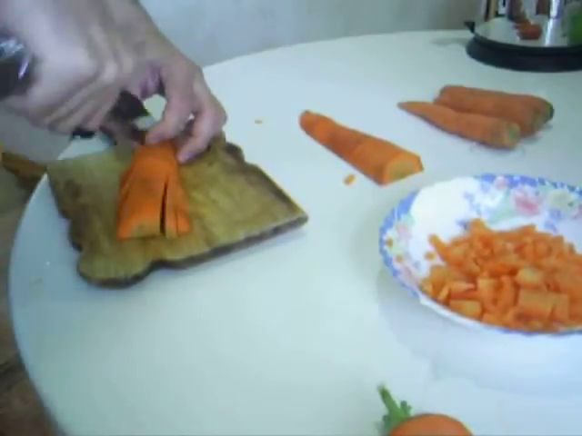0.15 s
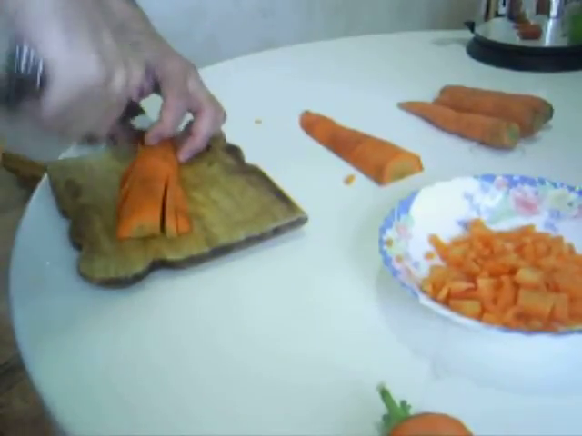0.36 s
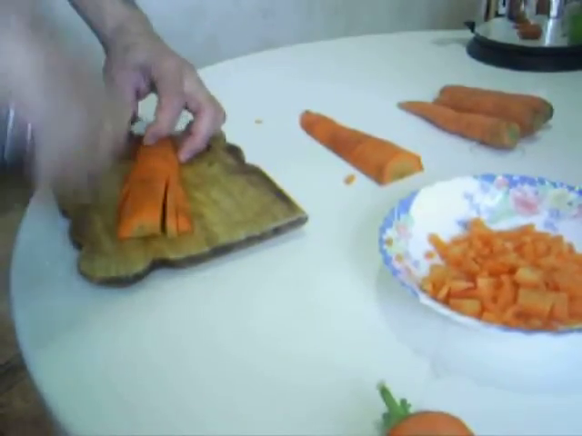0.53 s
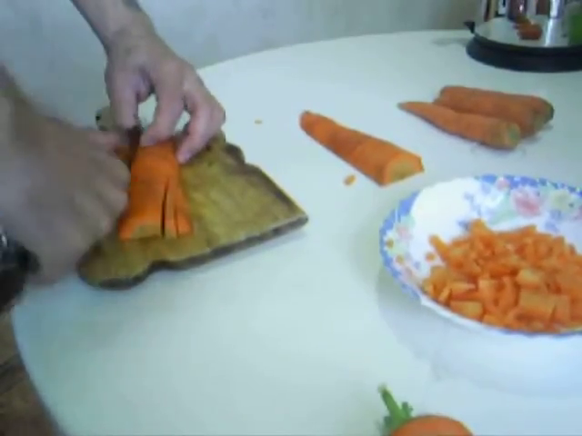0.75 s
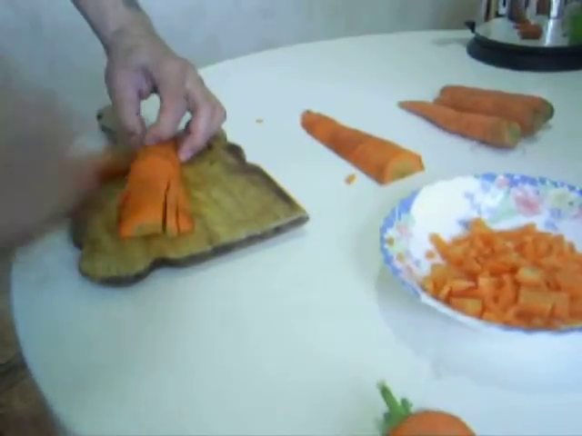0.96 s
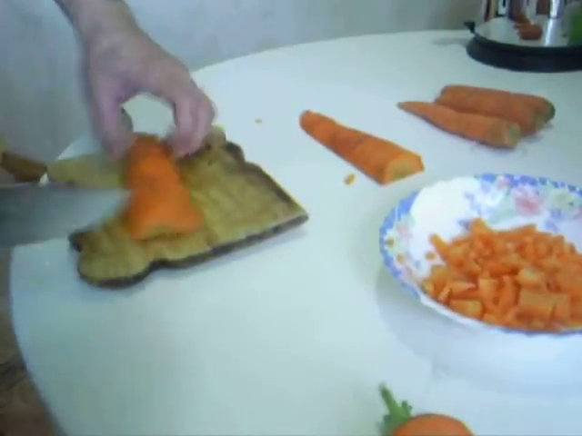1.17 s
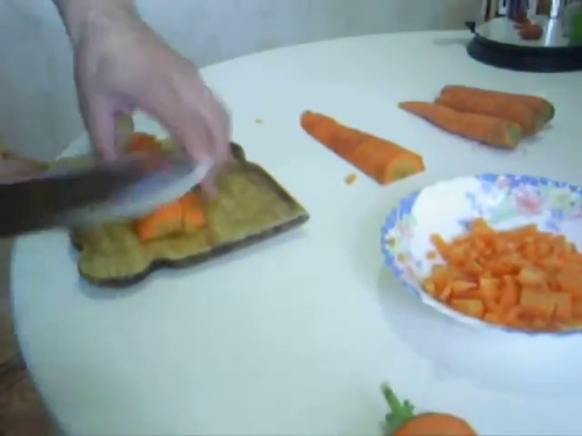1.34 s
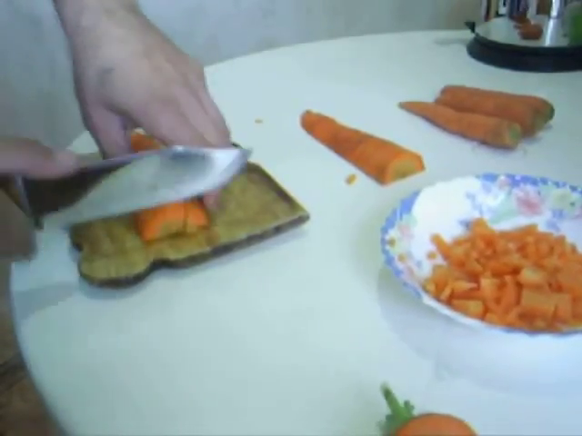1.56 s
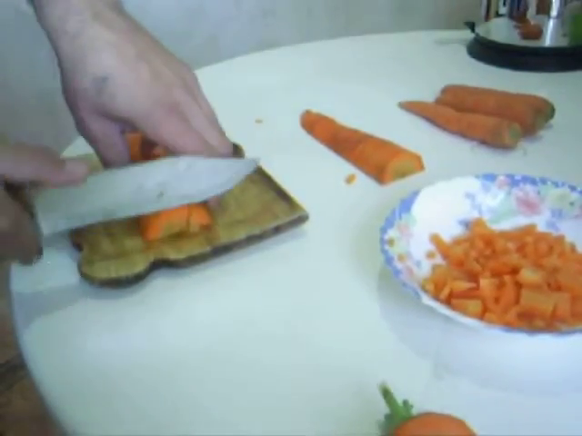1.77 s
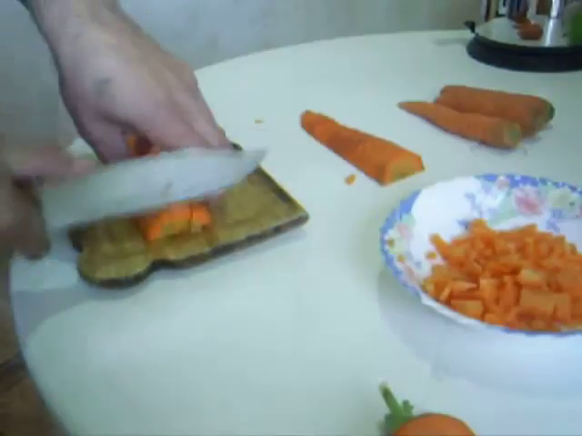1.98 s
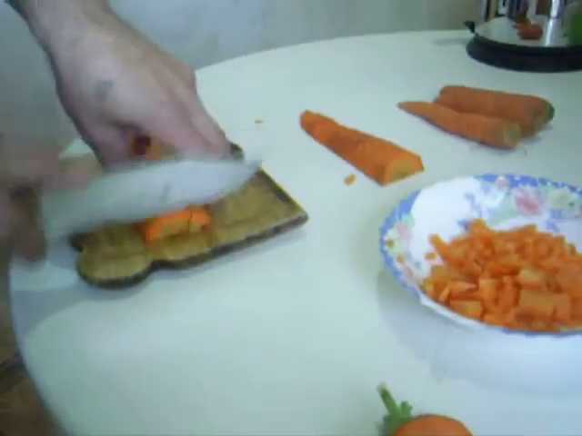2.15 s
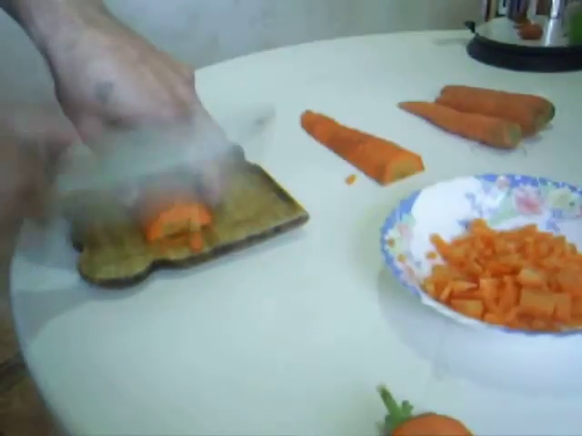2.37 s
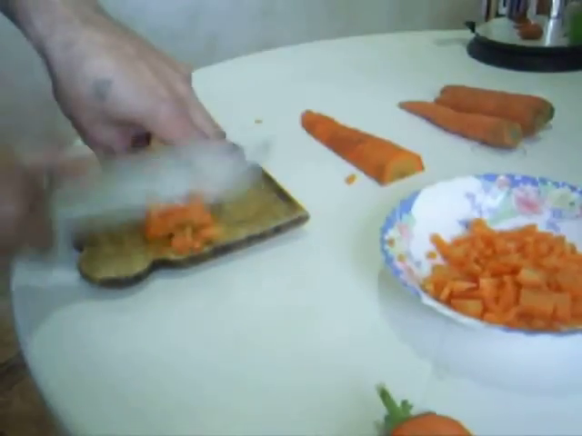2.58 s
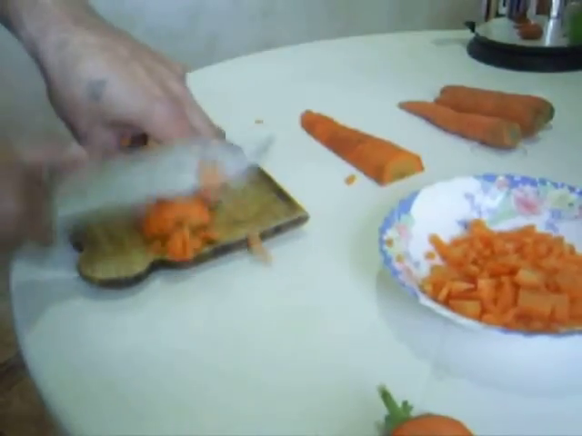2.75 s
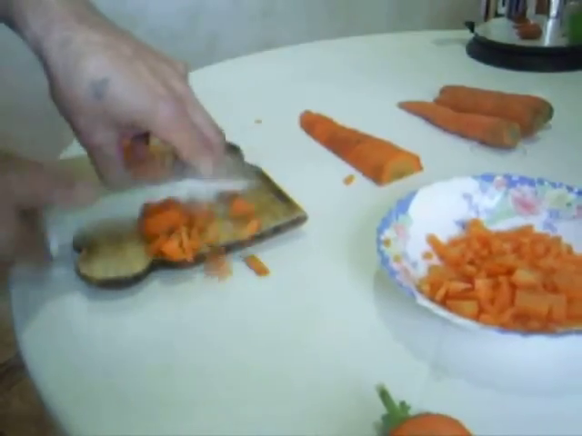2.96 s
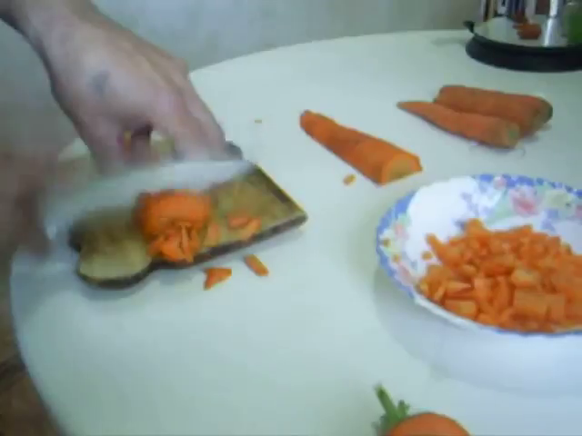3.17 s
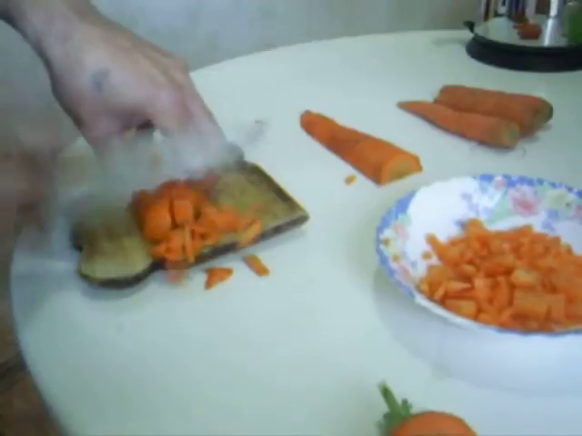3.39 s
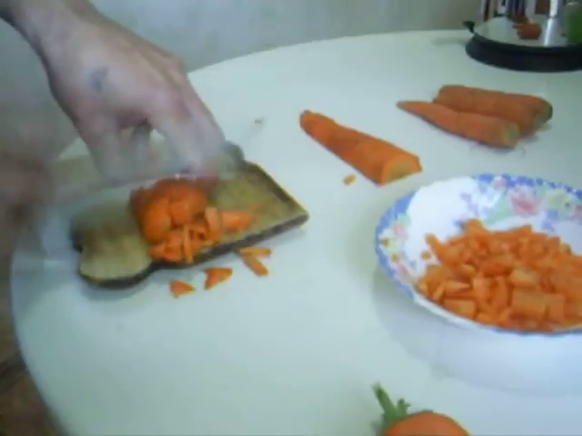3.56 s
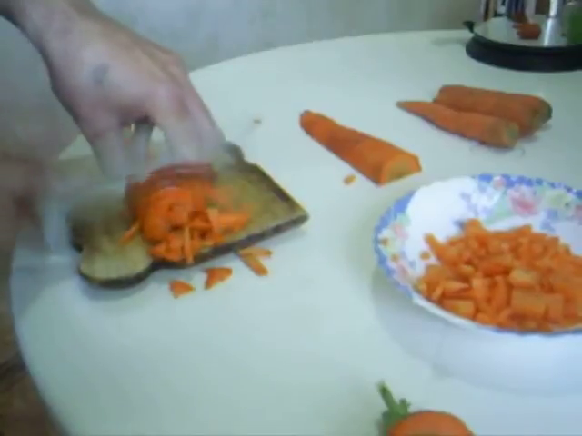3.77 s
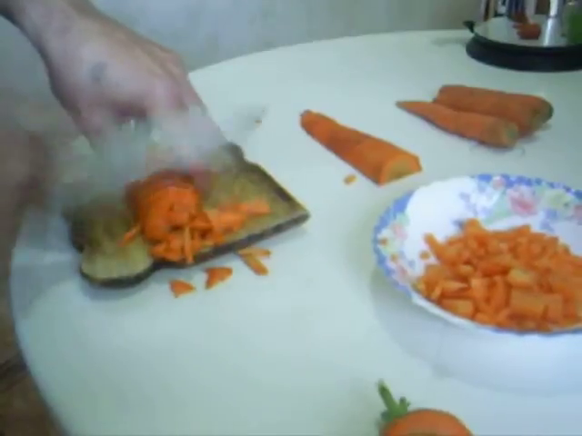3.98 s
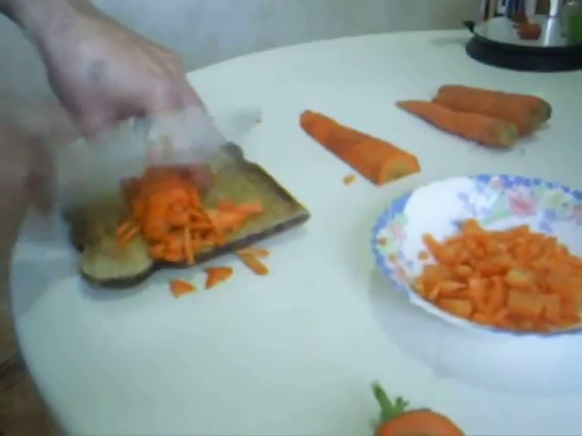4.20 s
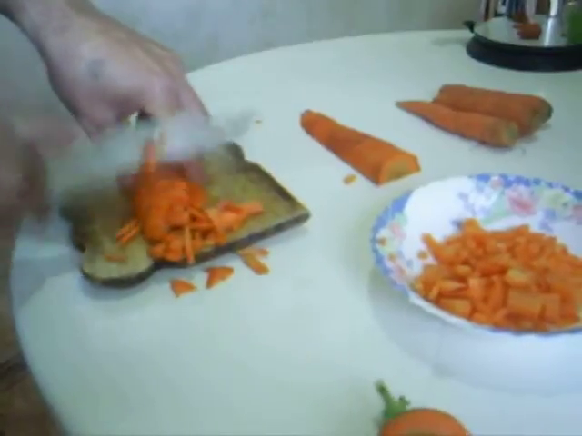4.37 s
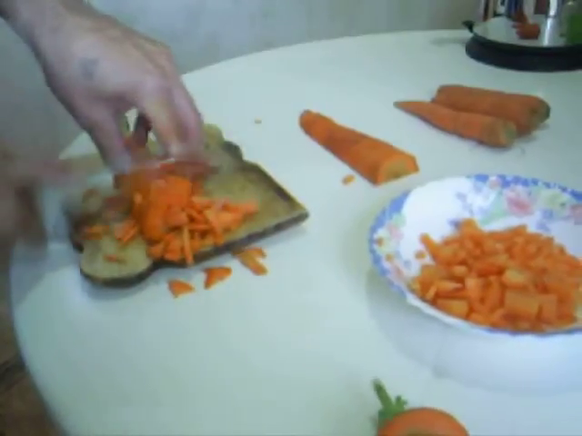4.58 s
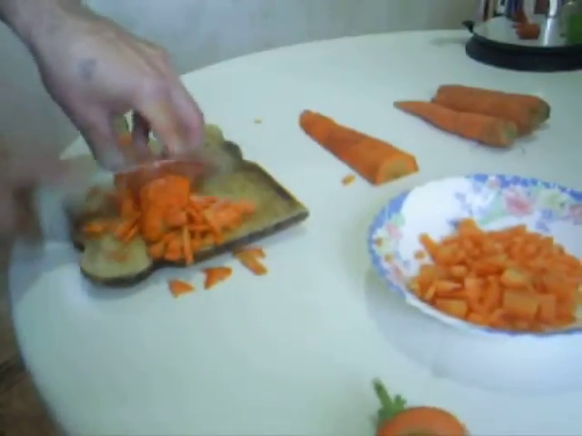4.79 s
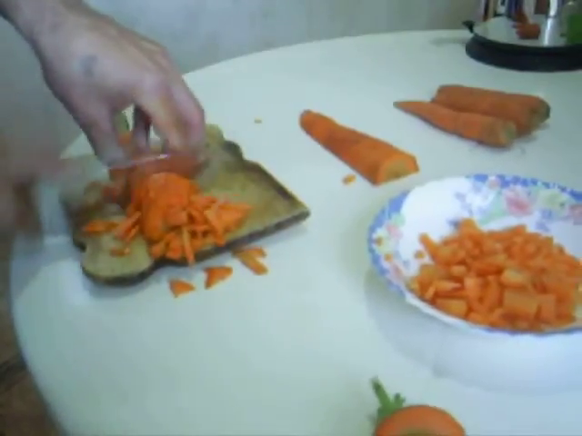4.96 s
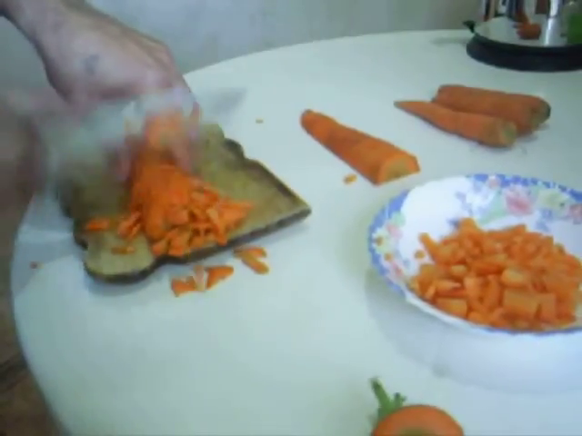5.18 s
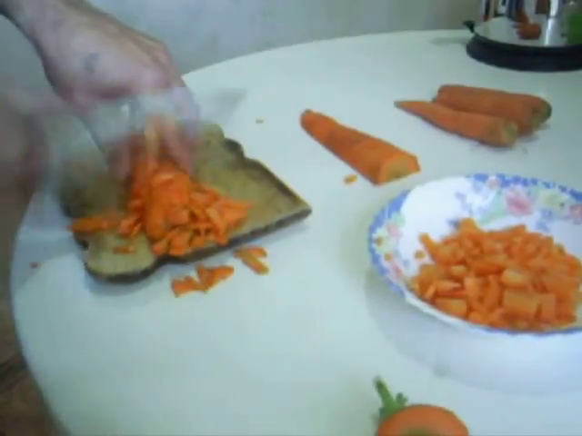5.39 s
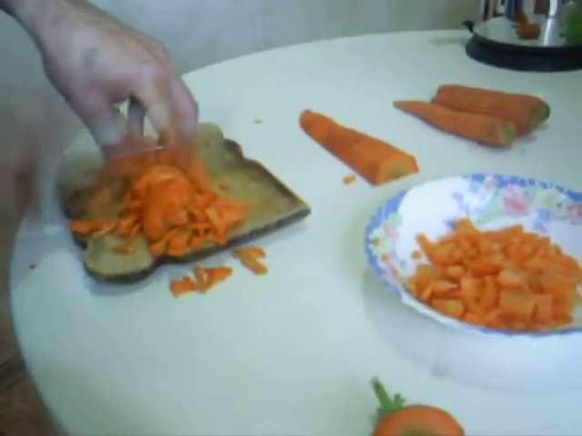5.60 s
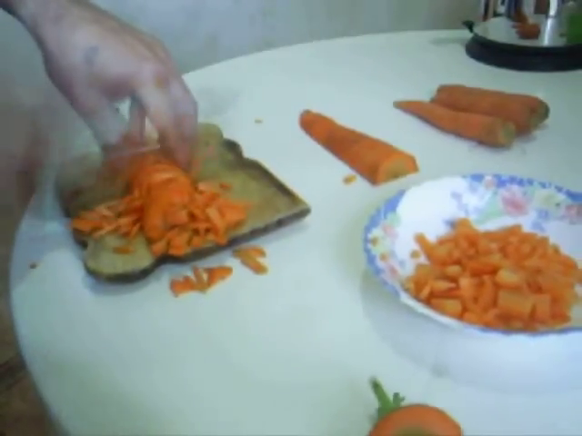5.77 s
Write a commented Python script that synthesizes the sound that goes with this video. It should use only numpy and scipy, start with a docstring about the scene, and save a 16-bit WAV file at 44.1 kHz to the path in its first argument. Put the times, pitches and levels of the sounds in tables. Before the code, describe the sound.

Two soft scrapes and some thumps of a cutting board, followed by quick, even knife chops through carrot, with ringing wood and steel.

```python
"""A kitchen knife cuts a carrot on a wooden board on a table, in a small hard-walled room.
Over faint room noise, the blade slits the carrot lengthwise in two slow scrapes of bursting cells.
Knife and carrot knock dully as they are set in place, and the board bumps against the table.
From 2.5 s the knife chops fast across the carrot: board and table ring, the blade more and more.
A small, dull-sounding microphone overloads on every strong blow."""
import sys
import numpy as np
from scipy import signal
from scipy.fft import rfft, irfft, next_fast_len
from scipy.io import wavfile
from scipy.ndimage import uniform_filter1d

SR = 44100
rng = np.random.default_rng(int(sys.argv[2]) if len(sys.argv) > 2 else 0)


def dump_mix(stems):
    """Bounce the given channels to the path in sys.argv[1] as a 16-bit WAV at rate SR."""
    frames = np.atleast_2d(stems).T  # one column per channel
    limited = np.clip(frames, -1, 1)  # hard clip at full scale
    pcm = np.round(limited * 32767).astype(np.int16)
    wavfile.write(sys.argv[1], SR, pcm)


N = 257544


def amp(db):
    return 10 ** (np.asarray(db) / 20)


def unit_rms(x):
    return x / np.sqrt(np.mean(x ** 2) + 1e-20)


def curve_at(curve, hz):
    """Reads a curve along a log-frequency axis."""
    points_hz, values = np.transpose(curve)
    return np.interp(np.log(hz + 1), np.log(points_hz + 1), values)


def add(mix, start_s, sound):
    part = mix[max(round(start_s * SR), 0):][:len(sound)]
    part += sound[:len(part)]


def tint(x, eq):
    """Runs a steady sound through an EQ curve, at rms 1."""
    hz = np.fft.rfftfreq(len(x), 1 / SR)
    return unit_rms(irfft(rfft(x) * amp(curve_at(eq, hz)), len(x)))


def band_noise(centre_hz, width_hz, size):
    """Noise in one resonance, at rms 1."""
    hz = np.fft.rfftfreq(size, 1 / SR)
    phases = np.exp(2j * np.pi * rng.random(len(hz)))
    return unit_rms(irfft(phases / (1 + (2 * (hz - centre_hz) / width_hz) ** 2), size))


# Colour of the noise bed: frequency_hz, gain_db
ROOM_TONE_EQ = [(30, -5), (65, -3.5), (110, 3.5), (250, -6.5), (410, -5), (620, -6), (1000, -13),
                (1700, -14), (2700, -17.5), (3800, -17.5)]
def room_tone(level_db=-35.5):
    """A steady bed of room noise and microphone hiss."""
    return amp(level_db) * tint(rng.standard_normal(N), ROOM_TONE_EQ)


# Reverb time of the room: frequency_hz, t60_s
ROOM_DECAY = [(100, 0.41), (300, 1), (700, 0.68), (1800, 0.65), (4000, 0.59)]
def room_reverb(early_db=10.0, early_s=0.0057, rise_s=0.0041):
    """Strong early reflections off table and walls, then a tail in which each band dies at its own speed."""
    hz, frame_s, bands = signal.stft(rng.standard_normal(SR), SR, nperseg=256)
    decay = amp(-60 * frame_s / curve_at(ROOM_DECAY, hz)[:, None])
    echoes = signal.istft(bands * decay, SR, nperseg=256)[1][:SR]
    t = np.arange(SR) / SR
    echoes *= 1 + amp(early_db) * np.exp(-t / early_s)
    spectrum = rfft(echoes, 2 * SR)
    power = uniform_filter1d(abs(spectrum) ** 2, size=100)
    whitened = irfft(spectrum * np.sqrt(power.mean() / power))[:SR]
    return whitened * (1 - np.exp(-t / rise_s))


def hand_pressure(length_s, attack_s=0.15, release_s=0.37):
    """The push behind a slow cut builds, holds, and lets go after length_s."""
    t = np.arange(0, length_s + release_s, 1 / SR)
    return np.minimum(t / attack_s, 1) * np.clip(1 - (t - length_s) / release_s, 0, 1)


# Colour of the blade rubbing through carrot: frequency_hz, gain_db
SCRAPE_EQ = [(40, -10), (70, -8.5), (110, 16), (200, 16), (430, 18.5), (750, 14), (1100, 10), (1600, 9.5),
             (2700, 7), (3600, 5.5)]
# Slow lengthwise cuts: start_s, length_s, scrape_db, squeak_db
SLOW_CUTS = [(0.318, 0.38, -33, -60.5), (1.654, 0.61, -34, -40.5)]
def slicing(cells_per_s=1500, spread_db=3.5, direct_gain=0.6, squeak_hz=1490, squeak_width_hz=130):
    """Carrot cells burst in tiny ticks along the blade, blurred by the room; the steel squeaks faintly."""
    ticks = (rng.random(N) < cells_per_s / SR) * rng.choice([-1, 1], N)
    ticks = ticks * amp(spread_db * np.minimum(rng.exponential(1, N), 4))
    blurred = signal.fftconvolve(ticks, room_reverb())[:N]
    scrape = tint(direct_gain * unit_rms(ticks) + unit_rms(blurred), SCRAPE_EQ)
    squeak = band_noise(squeak_hz, squeak_width_hz, N)
    out = np.zeros(N)
    for start_s, length_s, scrape_db, squeak_db in SLOW_CUTS:
        pressure = np.zeros(N)
        add(pressure, start_s, hand_pressure(length_s))
        out += pressure * amp(scrape_db) * scrape
        out += pressure ** 3 * amp(squeak_db) * squeak  # speaks only near full pressure
    return out


def board_shove(turn_s=0.00076, width_s=0.00026):
    """The punch of a blow: the board is shoved down and springs back just as far, in one cycle."""
    offset = (np.arange(SR // 100) / SR - turn_s) / width_s
    return -offset * np.exp((1 - offset ** 2) / 2)


def contact_db(hz, thud_db, hard_db, thud_hz=300, hard_hz=1300):
    """Two shelves: a heavy blow has more bass, a hard one more treble."""
    return thud_db / (1 + (hz / thud_hz) ** 4) + hard_db * (1 - 1 / (1 + (hz / hard_hz) ** 4))


def minimum_phase(gain):
    """Impulse response with this gain curve that rings only after its start."""
    cepstrum = irfft(np.log(np.maximum(gain, 1e-5)))
    half = len(cepstrum) // 2
    cepstrum[1:half] *= 2
    cepstrum[half + 1:] = 0
    return irfft(np.exp(rfft(cepstrum)))[:half]


# Body of the board, its dense resonances as one curve: frequency_hz, gain_db
BOARD_EQ = [(30, -34.5), (75, -1), (170, -15.5), (400, 1), (500, -1.5), (620, 4), (780, -3), (1050, -2.5),
            (1450, -1.5), (2300, -3.5), (2800, -6), (3800, -8.5)]
# Ring of the blade, damped by the hand: pitch_hz, width_hz, level_db
BLADE_MODES = [(1786, 320, 4), (1750, 16, 5.5), (1740, 47, -15), (2043, 44, -3)]
def board_and_blade(thud_db, hard_db, blade_db):
    """Wood and steel answer one click together."""
    hz = np.fft.rfftfreq(8192, 1 / SR)
    wood_power = amp(curve_at(BOARD_EQ, hz) + contact_db(hz, thud_db, hard_db)) ** 2
    steel_power = sum((amp(level_db + blade_db) / (1 + (2 * (hz - pitch_hz) / width_hz) ** 2)) ** 2
                      for pitch_hz, width_hz, level_db in BLADE_MODES)
    return minimum_phase(np.sqrt(wood_power + steel_power))


# Ring of table and board: pitch_hz, level_db, t60_s
TABLE_MODES = [(142, -5.5, .6), (213, -4, .6), (243, -4.5, .6), (286, -7, .55), (378, -12, .35),
               (427, -10, .35), (585, -5, .45), (702, -8, .5), (933, -12, .45), (1210, -16, .5),
               (1314, -15, .5), (1425, -15, .5), (1522, -13, .5), (2041, -14, .5), (2339, -17, .5)]
def table_ring(thud_db, hard_db, scatter_db=2, detune=0.0013, rise_s=0.0014):
    """The modes build up over a few ms; each blow lands on a different spot under a different grip."""
    t = np.arange(SR * 3 // 5) / SR
    ring = np.zeros(len(t))
    for pitch_hz, level_db, t60_s in TABLE_MODES:
        level_draw, pitch_draw, phase = rng.standard_normal(3)
        struck_db = level_db + scatter_db * level_draw + contact_db(pitch_hz, thud_db, hard_db)
        tone = np.sin(2 * np.pi * (pitch_hz * (1 + detune * pitch_draw) * t + phase))
        ring += amp(struck_db - 60 * t / t60_s) * tone
    return ring * (1 - np.exp(-t / rise_s))


def blow(room, thud_db, hard_db, blade_db, punch_db,
         echo_db=11, click_db=38, shove_db=19.0, table_db=-1, alike=0.66):
    """A shove and a click, then ringing wood and steel, in a room that answers partly alike each time."""
    paths = amp(echo_db) * (alike * room + np.sqrt(1 - alike ** 2) * room_reverb())
    paths[0] += amp(click_db + punch_db)  # the direct click
    sound = signal.fftconvolve(paths, board_and_blade(thud_db, hard_db, blade_db))
    add(sound, 0, amp(shove_db + punch_db) * board_shove())
    add(sound, 0, amp(table_db) * table_ring(thud_db, hard_db))
    return sound


# Dull handling knocks, and at 3.463 s the blade entering the carrot before a chop: start_s, strength_db,
# thud_db, hard_db, blade_db, punch_db
HANDLING_KNOCKS = [(0.6755, -27, 5.5, -4, -15.5, 5.5), (.924, -21.5, 10, -7, -26, -3.5),
                   (1.0735, -26.5, -15.5, -10, -7.5, -5.5), (1.2149, -22, 2, -7, -3.5, -2),
                   (1.455, -41, 2.5, -0.5, -13, -5), (1.672, -36.5, -4.5, -4.5, -2, -4),
                   (2.123, -28, -17, -15, -9.5, -7.5), (2.5003, -28, 6.5, -5, -25, 0),
                   (3.463, -30, 12, -8.5, -23, -13.5)]
def knocking(room):
    """Knife and carrot touch the board softly as they are set in place; the last knock is the blade entering
    the carrot just before the 3.5 s chop."""
    out = np.zeros(N)
    for start_s, strength_db, *contact in HANDLING_KNOCKS:
        add(out, start_s, amp(strength_db) * blow(room, *contact))
    return out


# Low swings of the rocking board: pitch_hz, level_db, t60_s
ROCKING_MODES = [(137.4, -0.5, 0.24), (216.3, -3.5, 0.41), (300.5, -4, 0.35), (448, -4, 0.16),
                 (585.6, 2, 0.13)]
def board_rock(tilt_db_per_octave, relative_width=0.55, rise_cycles=0.2, tone_gain=1.36, pivot_hz=300):
    """A soft, heavy contact: damped swings of the board, each inside a cluster of neighbouring modes."""
    t = np.arange(SR // 2) / SR
    out = np.zeros(len(t))
    for pitch_hz, level_db, t60_s in ROCKING_MODES:
        cluster = band_noise(pitch_hz, relative_width * pitch_hz, len(t))
        swing = tone_gain * np.sin(2 * np.pi * pitch_hz * t) + cluster
        envelope = amp(-60 * t / t60_s) * (1 - np.exp(-t * pitch_hz / rise_cycles))
        gain = amp(level_db + tilt_db_per_octave * np.log2(pitch_hz / pivot_hz))
        out += gain * unit_rms(swing * envelope) * np.sqrt(np.mean(envelope ** 2))
    return out


# Thumps of the board on the table: start_s, strength_db, tilt_db_per_octave
BOARD_BUMPS = [(0.678, -17, 3), (0.926, -15.5, -2), (1.086, -37.5, -10.5), (1.218, -18, 2.5),
               (2.129, -38, -12), (2.277, -37.5, -8), (2.5, -19.5, 1), (2.521, -16.5, 8), (3.5, -24.5, 3.5)]
def bumping(rebound_s=0.028, rebound_db=-9, rebound_db_per_octave=-3):
    """Leaned on, the board hits the table, lifts and drops back once, weaker and duller."""
    out = np.zeros(N)
    for start_s, strength_db, tilt in BOARD_BUMPS:
        add(out, start_s, amp(strength_db) * board_rock(tilt))
        rebound = board_rock(tilt + rebound_db_per_octave)
        add(out, start_s + rebound_s, amp(strength_db + rebound_db) * rebound)
    return out


# The blade rings more freely as it works along the carrot: time_s, blade_db
BLADE_SWELL = [(2.55, -5), (3.55, -2), (3.9, 2.5), (5.7, 7)]
# Fast chops through the carrot onto the board: start_s, strength_db, thud_db
FAST_CHOPS = [(2.521, -14, 5), (2.699, -19, 5), (2.8653, -16.5, -6), (3.0197, -18, -9.5), (3.159, -17, 2.5),
              (3.5, -17.5, 2), (3.636, -17, 6.5), (3.7963, -16, -2.5), (3.973, -17.5, -3.5),
              (4.114, -18, 6.5), (4.2807, -17.5, 1.5), (4.4459, -18.5, 1.5), (4.5956, -18, 0.5),
              (4.7593, -18, -3), (4.917, -19, 1.5), (5.091, -20.5, -2), (5.2449, -20, -0.5),
              (5.405, -19.5, -0.5), (5.5648, -21.5, 1.5), (5.734, -19.5, 0)]
def chopping(room, hard_db=-1, base_punch_db=-0.5, punch_per_thud=0.17):
    """Hard blows, about six a second; a heavier chop shoves the board harder."""
    out = np.zeros(N)
    for start_s, strength_db, thud_db in FAST_CHOPS:
        blade_db = np.interp(start_s, *np.transpose(BLADE_SWELL))
        punch_db = base_punch_db + punch_per_thud * thud_db
        add(out, start_s, amp(strength_db) * blow(room, thud_db, hard_db, blade_db, punch_db))
    return out


def scene():
    """All layers in mono; knocks and chops share one room."""
    room = room_reverb()
    return (room_tone() + slicing() + knocking(room) + bumping() + chopping(room))[None]


def lag(x, time_s):
    """Smooths a control so that it follows late."""
    keep = np.exp(-1 / (time_s * SR))
    return signal.lfilter([1 - keep], [1, -keep], x)


def compressor(x, threshold_db=-10, squeeze=0.084, attack_s=0.001, release_db_per_s=100,
               bias=0.058, bias_knee_db=2, bias_s=0.001):
    """Too slow for the first shove, it ducks the ring; while it acts the signal sits just below zero."""
    fall_db = np.arange(x.shape[-1]) / SR * release_db_per_s
    level_db = 20 * np.log10(abs(x) + 1e-9)
    held_db = np.maximum.accumulate(level_db + fall_db, axis=-1) - fall_db
    over_db = lag(lag(np.maximum(held_db - threshold_db, 0), attack_s), attack_s)
    sag = bias * lag(np.tanh(over_db / bias_knee_db), bias_s)
    return x * amp(-squeeze * over_db) - sag


# Treble colour after the overloaded stage: frequency_hz, gain_db
OUTPUT_EQ = [(4300, -0.5), (5200, -8), (6400, -5.5), (8500, -0.5), (12500, -7), (16000, -5)]
def record(dry, knee_hz=3730, slope_hz=225, ceiling=0.708, high_cut_hz=16800):
    """The microphone passes little above 4 kHz; overload flattens the peaks and adds a spit of treble."""
    size = next_fast_len(N + 4096)
    hz = np.fft.rfftfreq(size, 1 / SR)
    rolloff = np.exp(-(np.maximum(hz - knee_hz, 0) / slope_hz) ** 2 / 2)
    dull = irfft(rfft(dry, size) * rolloff, size)
    clipped = np.clip(compressor(dull), -ceiling, ceiling)
    coloured = irfft(rfft(clipped) * amp(curve_at(OUTPUT_EQ, hz)), size)
    high_cut = signal.firwin(511, high_cut_hz, window=("kaiser", 9), fs=SR)
    return signal.oaconvolve(coloured, high_cut[None], "same")[:, :N]


dry = scene()
out = record(dry)
dump_mix(out)
```